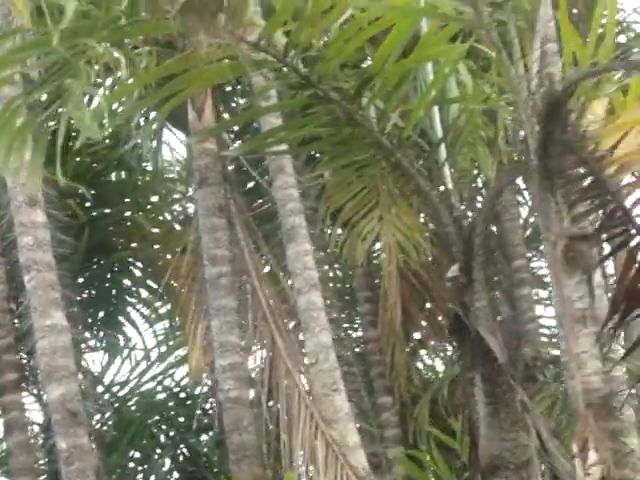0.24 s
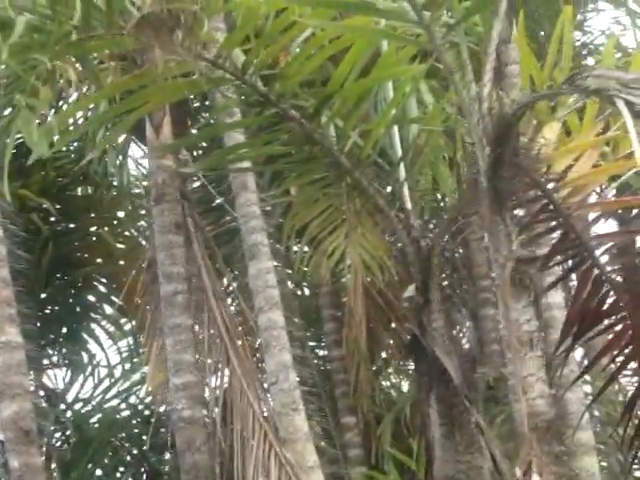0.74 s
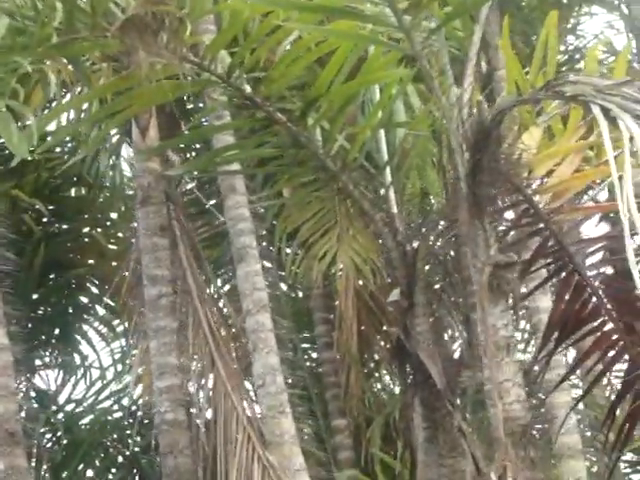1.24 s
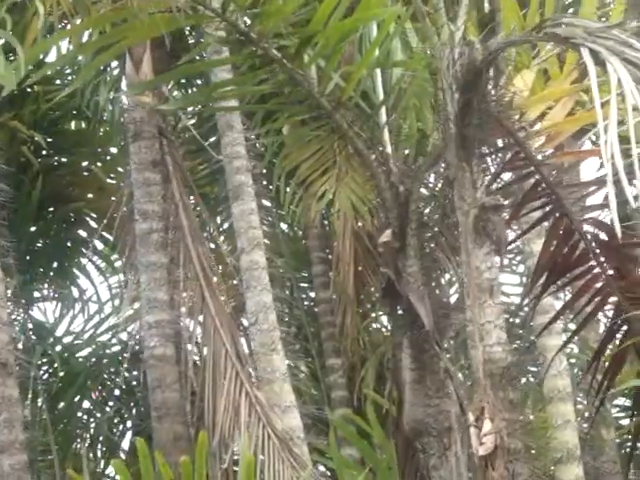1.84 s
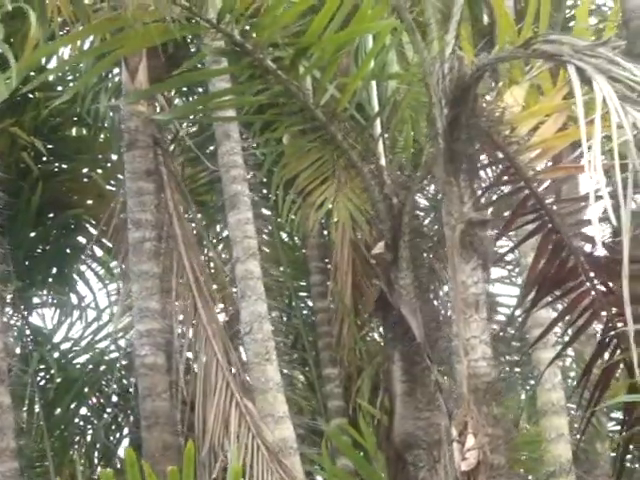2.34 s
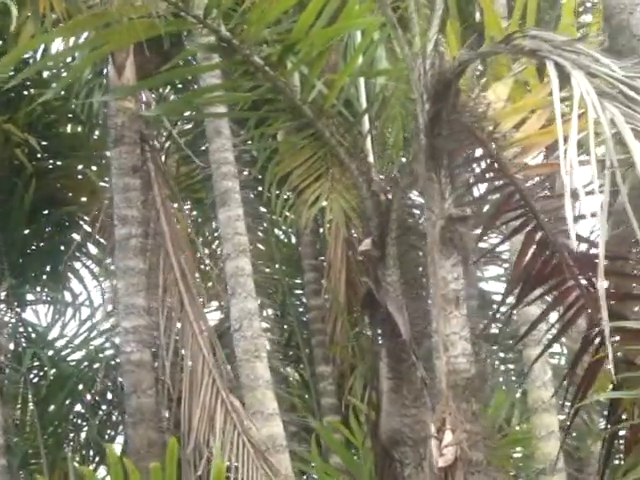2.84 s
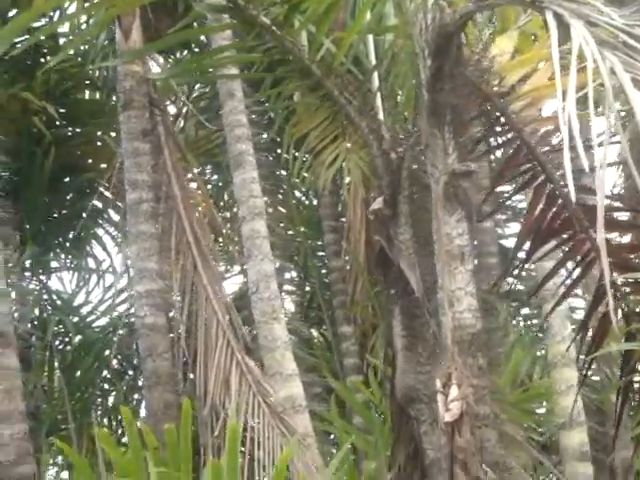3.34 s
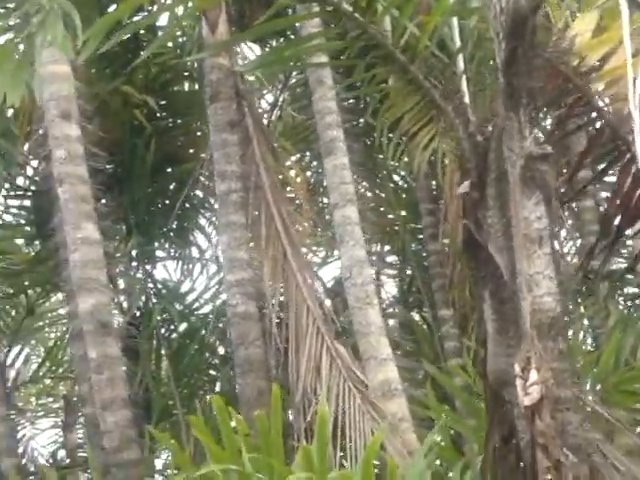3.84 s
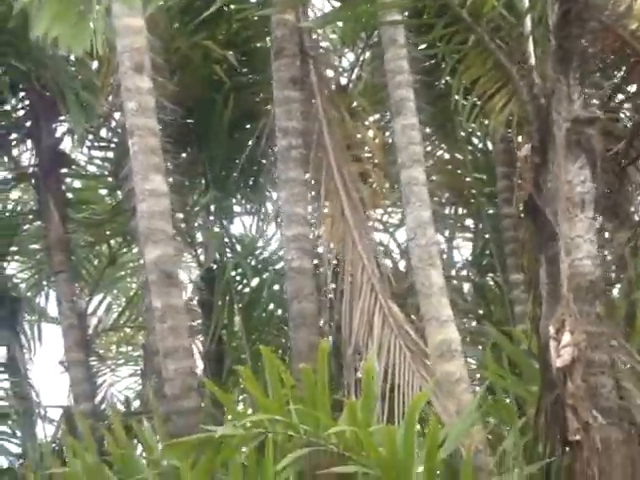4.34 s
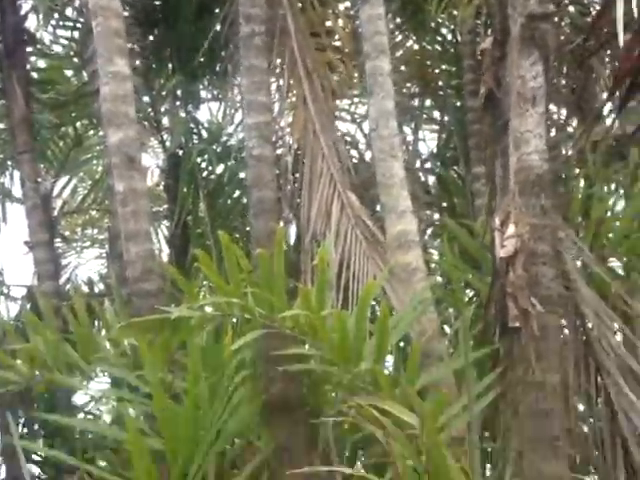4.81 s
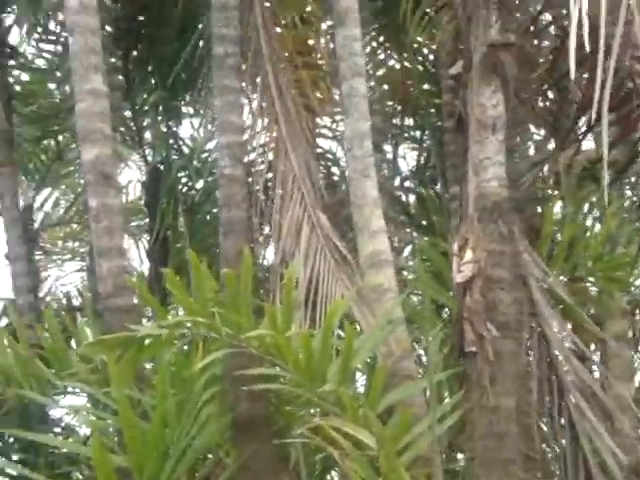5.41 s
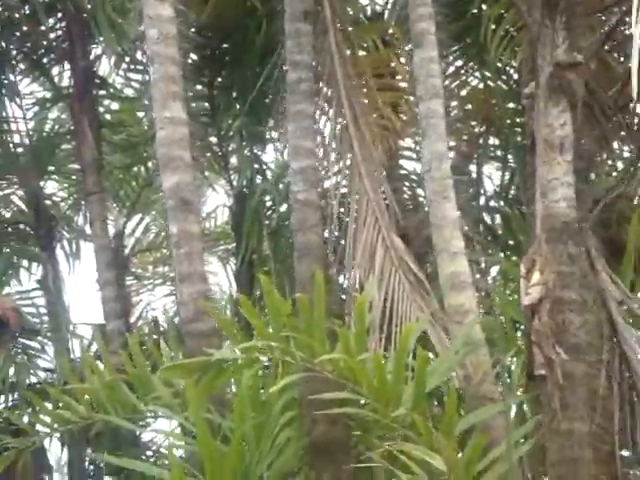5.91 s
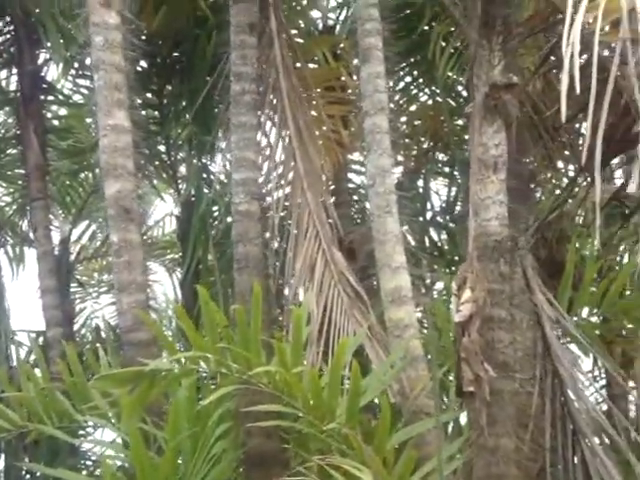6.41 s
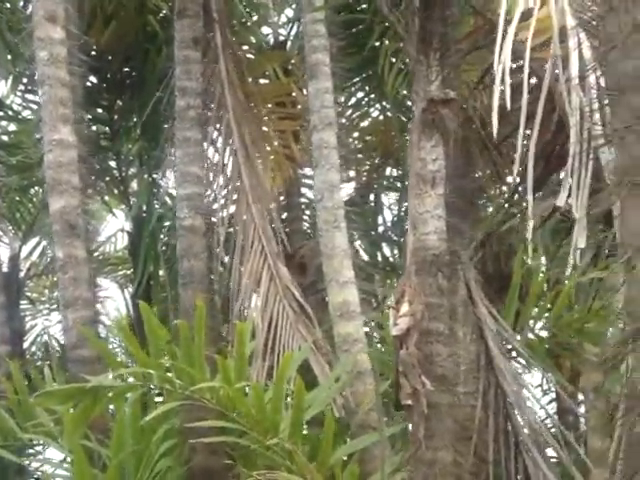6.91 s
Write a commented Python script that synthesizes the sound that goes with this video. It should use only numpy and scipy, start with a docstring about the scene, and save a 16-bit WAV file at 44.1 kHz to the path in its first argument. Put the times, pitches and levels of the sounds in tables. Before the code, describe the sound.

A colony of birds squawks, trills, chips and squeals among palms, with sharp bill snaps, short echoes and a faint leafy hush.

```python
"""A colony of birds in palm crowns, a few metres from a small mono microphone, over a hush of filtered noise.
Whistles (gliding harmonics) open; from 0.5 s come trills (pitch and level swung together), low clucks, rising
chips and bill snaps (noise bursts in one resonance). A long squeal at 2.5 s arches up and slides down; a run
of chips and clucks follows near 4 s, then short squeals, more snaps and a last shriek at 6.5 s.
Fronds and trunks scatter a short echo of every call, by convolution with decaying noise."""
import sys
import numpy as np
from scipy import signal
from scipy.fft import rfft, irfft, next_fast_len
from scipy.io import wavfile
from scipy.ndimage import uniform_filter1d

SR = 44100
rng = np.random.default_rng(int(sys.argv[2]) if len(sys.argv) > 2 else 0)


def store_pcm(level_fs):
    """Save levels as 16-bit WAV."""
    pcm = np.round(np.clip(level_fs, -1, 1) * 32767).astype(np.int16)
    wavfile.write(sys.argv[1], SR, np.atleast_2d(pcm).T)


N = 315756


def undb(db):
    """Decibel definition: amplitude ratio of a level in dB."""
    return 10 ** (np.asarray(db) / 20)


def colour_db(points, hz):
    """Spectral envelope: level through (Hz, dB) points, straight on a log-frequency axis."""
    point_hz, point_db = np.transpose(points)
    return np.interp(np.log(np.maximum(hz, 1)), np.log(point_hz), point_db)


def unit(x):
    """Power normalisation: scales to an rms of 1."""
    return x / np.sqrt(np.mean(x ** 2))


def crest(x):
    """Peak normalisation: scales to a peak of 1."""
    return x / np.max(np.abs(x))


def wander(n, hz):
    """Band-limited random modulation: drift between -1 and 1, changing about hz times a second."""
    k = max(int(SR / hz), 1)
    noise = rng.standard_normal(n + 4 * k)
    drift = uniform_filter1d(uniform_filter1d(noise, k), k)[2 * k:2 * k + n]
    return np.tanh(np.sqrt(k) * drift)


def add(out, start_s, x):
    """Superposition: sums a sound into the scene from its start time."""
    i = int(start_s * SR)
    out[i:i + len(x)] += x[:N - i]


# Leaves and distance: relative spectrum of the noise. Each row: frequency in Hz, level in dB per Hz.
HUSH = [(12, -70.5), (20, -27), (117, -8), (191, -2.5), (235, -1.5), (375, 1), (882, -1), (953, -2),
        (1970, -5.5), (2690, -6.5), (3580, -5.5), (4180, -7), (9840, -12.5), (12800, -60), (21600, -120)]
HUSH_DB = -52  # rms level


def hush():
    """Filtered noise: leaves and distance, in half-octave bands whose levels flicker independently."""
    n = next_fast_len(N)
    f = np.arange(n // 2 + 1) * SR / n
    noise = rfft(rng.standard_normal(n)) * undb(colour_db(HUSH, f))
    edges_hz = np.r_[0, 100 * 2 ** np.arange(0, 7, .5), SR]
    total = np.zeros(N)
    for low_hz, high_hz in zip(edges_hz, edges_hz[1:]):
        band = irfft(noise * (f >= low_hz) * (f < high_hz), n)[:N]
        total += band * undb(2.3 * wander(N, 3.36))
    return unit(total) * undb(HUSH_DB)


FADE_S = 0.0017  # soft edges of every call
ONSET_DB, RELEASE_DB = -16, -18  # at the very start, below the held level; at the very end, below the hold's end


def phrase(start_s, attack_s, hold_s, release_s, onset_hz, held_hz, end_hz, db, swell_db, bend):
    """Envelope and glide: level rises, swells or sags, drops; pitch slides to its hold, then bends away."""
    knots = np.cumsum([0, attack_s, hold_s, release_s])
    t = np.arange(0, knots[-1], 1 / SR)
    # a bend of 1 glides straight, more leaves the held pitch later
    late = np.clip((t - attack_s) / (hold_s + release_s), 0, 1) ** bend
    hz = np.interp(t, knots[:2], [onset_hz, held_hz]) + (end_hz - held_hz) * late
    level_db = db + np.interp(t, knots, [ONSET_DB, 0, swell_db, swell_db + RELEASE_DB])
    edge = np.clip(np.minimum(t, knots[-1] - t) / FADE_S, 0, 1)
    return start_s, t, edge, hz, level_db


def notes(rows, release_s, bend):
    """Common articulation: phrases that share one release and one bend."""
    return [phrase(start_s, attack_s, hold_s, release_s, *rest, bend)
            for start_s, attack_s, hold_s, *rest in rows]


def syrinx(hz, overtones_db, flicker_db=0, flicker_hz=25):
    """Harmonic source: additive synthesis on a moving pitch, each harmonic flickering on its own."""
    phase = 2 * np.pi * np.cumsum(hz) / SR
    total = np.zeros(len(hz))
    for k, db in enumerate(overtones_db, 1):
        gain = undb(db + flicker_db * wander(len(hz), flicker_hz))
        # harmonics fade out from 1/4 to 3/8 of the sample rate, against aliasing
        gain = gain * np.clip(3 - 8 * k * hz / SR, 0, 1)
        total += gain * np.sin(k * phase + k * k)
    return np.sqrt(2) * total


def resonate(x, peaks, slope=None):
    """Resonance: a spectrum boosted by (Hz, width Hz, boost dB) peaks and a (Hz, dB) slope."""
    f = np.arange(len(x) // 2 + 1) * SR / len(x)
    db = sum(boost_db / (1 + (2 * (f - hz) / width_hz) ** 2) for hz, width_hz, boost_db in peaks)
    if slope:
        db = db + colour_db(slope, f)
    return irfft(rfft(x) * undb(db), len(x))


# Broad colour of the vocal tract. Each row: frequency in Hz, level in dB.
THROAT = [(400, -35), (700, -4), (1000, -1.5), (2000, -0.5), (4500, 1), (7000, -6.5), (8500, -14.5),
          (10500, -22.5)]
# Resonances of the windpipe. Each row: centre in Hz, width in Hz, boost in dB.
BEAK = [(1440, 1800, 1.5), (3350, 840, 3), (6500, 610, 2)]


def throat(x, bill=()):
    """Source-filter principle: windpipe and bill shape a call, brought to an rms of 1."""
    return unit(resonate(x, [*BEAK, *bill], THROAT))


def steady_voices(out, calls, overtones, bill, waver, flicker_db, breath_db):
    """Harmonic source plus turbulence: nearly steady pitches that waver, with some air escaping."""
    for (start_s, t, edge, hz, db), overtones_db in zip(calls, overtones):
        n = len(t)
        hz = hz * (1 + waver * wander(n, 200))
        breath_gain = undb(breath_db + 8.3 * wander(n, 20))
        breath = breath_gain * throat(rng.standard_normal(n))
        voice = resonate(syrinx(hz, overtones_db, flicker_db, flicker_hz=54.0), bill)
        level = undb(db + 1.5 * wander(n, 150))
        add(out, start_s, edge * level * (voice + breath))


# Clean whistles. Each row: start in seconds, attack in seconds, hold in seconds, onset pitch in Hz,
# held pitch in Hz, end pitch in Hz, level in dB, swell over the hold in dB.
WHISTLES = [ (0.0, .005, 0.15, 5074, 5090, 4000, -61, 2.5), (0.15, .03, .14, 3917, 4122, 4038, -58, -1),
            (0.355, .02, .035, 4831, 6231, 6130, -44, -4), (0.42, .004, 0.035, 5250, 5240, 4450, -44, -9.5),
            (1.055, .004, .04, 6113, 6113, 6200, -47, -3), (2.215, 0.011, 0.039, 2410, 2574, 2575, -24, -8),
            (3.8, 0.0067, 0.044, 6890, 6960, 6564, -57, -6), (3.853, 0.013, .02, 6409, 6300, 7600, -35, -2),
            (4.31, 0.038, 0.09, 3530, 3437, 4130, -33.5, -1.5), (4.55, 0.019, .23, 678, 675, 663, -56, -2),
            (4.642, .006, .05, 2490, 2498, 2539, -23.5, -28.5),
            (4.745, .032, .01, 5555, 5904, 6076, -47.5, -11),
            (4.95, 0.052, .11, 2960, 2570, 1830, -52, 4.5), (6.0, .004, .074, 1964, 1950, 1609, -58, -2),
            (6.085, 0.036, 0.06, 1900, 2223, 1550, -44.5, -8),
            (6.19, .003, .016, 6646, 6600, 6646, -46, -20),
            (6.212, 0.0065, .04, 6250, 6380, 7800, -42.5, -1), ]
# Whistle spectrum. Each entry: level of one harmonic in dB, from the fundamental up.
WHISTLE_OVERTONES = [0, -30.5, -39]
WHISTLE_RELEASE_S, WHISTLE_BEND = .008, 1.3


def whistles(out):
    """Near-sinusoidal tone: a strong fundamental with weak overtones and faint breath."""
    calls = notes(WHISTLES, WHISTLE_RELEASE_S, WHISTLE_BEND)
    steady_voices(out, calls, [WHISTLE_OVERTONES] * len(WHISTLES), [],
                  waver=0.025, flicker_db=2.5, breath_db=-31)


def tail(t60_s, gap_s, db):
    """Exponential decay: noise as dense scattered echoes, silent during the first gap."""
    t = np.arange(SR) / SR
    echoes = rng.standard_normal(SR) * 1000 ** (-t / t60_s) * (t > gap_s)
    return undb(db) * unit(echoes) / np.sqrt(SR)


# fronds around the nests
NEAR_T60_S, NEAR_DB, NEAR_GAP_S = 0.09, -4.5, .003
# trunks; the level is before the band filter
GROVE_T60_S, GROVE_DB, GROVE_GAP_S, GROVE_TOP_HZ = 0.66, -13.5, 0.017, 5050


def grove(x):
    """Convolution with an impulse response: quick echoes off the fronds, a dull tail from the trunks."""
    dull = signal.butter(1, [500, GROVE_TOP_HZ], "band", fs=SR, output="sos")
    fronds = tail(NEAR_T60_S, NEAR_GAP_S, NEAR_DB)
    trunks = signal.sosfilt(dull, tail(GROVE_T60_S, GROVE_GAP_S, GROVE_DB))
    return signal.fftconvolve(x, fronds + trunks)[:N]


# Trilled and rasping calls. Each row: voice name, swing rate in Hz, start in seconds, attack in seconds,
# hold in seconds, release in seconds, onset pitch in Hz, held pitch in Hz, end pitch in Hz, level in dB,
# swell over the hold in dB.
TRILLS = [ ("dive", 51, .541, .003, .018, .004, 7900, 7900, 1020, -34.5, -10),
          ("rasp", 51, .552, .008, .175, .008, 2633, 2600, 2350, -39, -1),
          ("warble", 48, 0.913, 0.01205, .085, .025, 1810, 1850, 2150, -31, 8.5),
          ("pipe", 49.5, 1.003, 0.0218, .03, 0.031, 1900, 2480, 2390, -23.5, -2),
          ("twitter", 37, 1.482, .022, .06, .035, 3056, 3020, 2030, -41, 1),
          ("chatter", 25.7, 1.645, .035, .205, .025, 2900, 2782, 1315, -40, 7.8),
          ("low warble", 30, 1.832, .07, .17, .055, 1087, 1083, 860, -30, -1.1),
          ("scold", 58, 2.67, .07, .04, 0.085, 1700, 1700, 1710, -33.5, -1),
          ("screech", 103.5, 3.065, 0.0249, .13, .08, 2583, 2845, 2540, -23.5, 0.5),
          ("thin rasp", 65, 3.07, .06, .11, .12, 1800, 1795, 1516, -30.5, -2),
          ("wail", 63.5, 3.13, .03, .1, .125, 2670, 2540, 1230, -30.5, 0.46),
          ("scold", 76, 3.722, .023, .005, .04, 1405, 1445, 1350, -43, -1),
          ("dive", 45, 3.888, .002, .014, 0.00399, 7500, 7500, 915, -26.5, -12.5),
          ("rasp", 46, 3.892, 0.0081, .165, .065, 2233, 2200, 2050, -35.5, -2),
          ("thin rasp", 31, 4.1, 0.039, .35, 0.094, 2207, 2205, 2190, -44, 2.9),
          ("squawk", 50.3, 5.138, .035, .44, .1, 1350, 1140, 1120, -22.5, -4),
          ("flutter", 76, 6.078, .03, .03, .008, 3280, 3900, 3950, -44.5, -2),
          ("dive", 68, 6.247, .013, 0.0039, .012, 7000, 4400, 2900, -24, -1),
          ("buzz", 153, 6.25, .015, .12, 0.009, 823, 835, 810, -32, -5.5),
          ("croak", 57.5, 6.38, .04, .275, 0.0125, 1703, 1709, 1620, -35.5, 2),
          ("shriek", 234.5, 6.515, .065, .132, .025, 2200, 2690, 1300, -18.5, -5.5), ]
# Voices by name. Each row: level swing in dB, harmonic slope in dB per octave, bill resonance in Hz,
# its boost in dB, pitch swing in octaves at start and at end, roughness in octaves of random pitch
# at start and at end, bend of the glide (no unit).
VOICES = { "dive": (1, -7.5, 1000, -6, 0.04, 0.07, 0.13, 0.2, 1.1),
          "rasp": (.9, 7.2, 5250, 3.7, .09, 0.132, .4, .55, 1.2),
          "thin rasp": (1.5, 2.7, 7330, 10.3, .06, .08, .55, .57, 1.8),
          "warble": (.1, 2.4, 2840, 10.7, .52, .36, 0.242, 0.204, 1.3),
          "pipe": (.1, 2.2, 2400, 16.6, 0.056, .005, 0.083, .03, 1.12),
          "twitter": (1.2, 2.5, 5330, 11.6, .05, .14, 0.12, 0.076, 1.6),
          "chatter": (.6, 3.3, 5540, 8, 0.0804, .33, 0.081, .12, 2.8),
          "low warble": (.5, -.5, 2252, -6, .56, 0.53, 0.2, 0.35, 3.0),
          "scold": (2.5, -1, 2999, 8.5, 0, .06, 0.44, 0.24, 1.1),
          "screech": (1.5, -14.5, 7200, 0, 0.04, .08, 0.16, 0.06, 1.2),
          "wail": (0, -9, 1998, -0.5, 0.13, 0, .12, .14, 1.14),
          "squawk": (2.7, 0.63, 3110, 5.6, .33, .07, .4, .22, 1.1),
          "flutter": (3.5, -4, 3998, -13.5, .02, 0.1, .05, .05, 1),
          "buzz": (6.9, 3, 2120, 25.6, 0.041, 0.046, .13, .18, 1.09),
          "shriek": (.5, 3, 2800, 11.8, .11, 0.021, .15, .03, 3.5),
          "croak": (1.4, 5.6, 1760, 11, .025, .025, .23, 0.191, 1.9), }
BILL_WIDTH_HZ = 1050


def trills(out):
    """Frequency and amplitude modulation: a second oscillator and the membrane's unrest bend the pitch."""
    octave_of_harmonic = np.log2(np.arange(1, 11))
    for voice, swing_hz, *call in TRILLS:
        swing_db, slope_db, bill_hz, bill_db, *ends, bend = VOICES[voice]
        start_s, t, edge, hz, db = phrase(*call, bend)
        n = len(t)
        octaves, rough = np.linspace(ends[::2], ends[1::2], n, axis=1)
        # the swing lingers at both ends of its travel
        swing = np.tanh(2.5 * np.cos(2 * np.pi * swing_hz * t))
        hz = hz * 2 ** (octaves * swing + rough * wander(n, 1500))
        grain_db = swing_db * swing + 4 * np.tanh(4 * rough) * wander(n, 330)
        source = syrinx(hz, slope_db * octave_of_harmonic, flicker_db=4, flicker_hz=120)
        shaped = throat(source, [(bill_hz, BILL_WIDTH_HZ, bill_db)])
        add(out, start_s, edge * undb(db + grain_db) * shaped)


# Low clucks. Each row: start in seconds, peak level in dB.
CLUCKS = [(0.561, -27.5), (0.612, -34), (0.649, -32.5), (0.776, -35.5), (3.901, -26), (3.949, -30.5),
          (4.009, -36.5), (4.171, -34.5), (4.201, -34), (4.23, -31), (4.259, -28), (4.291, -29),
          (4.327, -26.5), (4.358, -29), (4.386, -29.5), (4.42, -29.5), (4.456, -28.5), (4.488, -31),
          (4.524, -30.5)]
# Shape of one cluck: start pitch in Hz, end pitch in Hz, length in seconds.
CLUCK = (1100, 670, 0.0179)


def clucks(out):
    """Falling glide: short low grunts whose pitch sags under fast random modulation."""
    high_hz, low_hz, length_s = CLUCK
    t = np.arange(0, length_s, 1 / SR)
    envelope = np.minimum(t / 0.0015, 1) * (1 - t / length_s)
    for start_s, db in CLUCKS:
        glide_hz = np.interp(t, [0, length_s], [high_hz, low_hz])
        hz = glide_hz * (1 + 0.398 * wander(len(t), 1100))
        grunt = syrinx(hz, [5.5, -25, -30, -32, 4])
        add(out, start_s, undb(db) * crest(envelope * grunt))


# Rising chips. Each row: start in seconds, peak level in dB.
CHIPS = [(0.685, -31), (0.7841, -26), (0.826, -23), (0.8755, -27.5), (0.9044, -31), (4.0128, -28.5),
         (4.0655, -23.5), (4.1124, -21.5), (4.1607, -22.5), (4.2044, -22), (4.249, -24), (4.2896, -25.5)]
# Shape of one chip: start pitch in Hz, end pitch in Hz, rise in seconds, length in seconds.
CHIP = (2450, 5500, .022, 0.035)


def chips(out):
    """Rising glide: an upward sweep over a gritty, randomly modulated buzz held near 2900 Hz."""
    low_hz, high_hz, rise_s, length_s = CHIP
    t = np.arange(0, length_s, 1 / SR)
    envelope = np.minimum(t / 0.0028, 1) * np.exp(-t / 0.015)
    for start_s, db in CHIPS:
        glide_hz = np.interp(t, [0, rise_s], [low_hz, high_hz])
        sweep = syrinx(glide_hz * (1 + 0.082 * wander(len(t), 900)), [0, -18])
        buzz = syrinx(2900 * (1 + 0.164 * wander(len(t), 1190)), [-1.5, -12])
        add(out, start_s, undb(db) * crest(envelope * (sweep + buzz)))


# Bill snaps and knocks on wood. Each row: start in seconds, peak level in dB, centre in Hz,
# width in octaves, decay time to -60 dB in seconds.
SNAPS = [(0.743, -13, 2750, 0.38, 0.022), (0.7468, -11.5, 2040, 1.27, 0.031), (1.502, -37, 201, 0.22, 0.24),
         (4.636, -20, 2700, 0.18, 0.011), (4.637, -28.5, 940, 0.34, 0.028),
         (5.776, -25.5, 2040, 0.82, 0.014), (5.92, -15.5, 720, 0.66, 0.02), (5.9204, -18, 2640, 0.2, 0.015),
         (6.389, -31, 610, 1, 0.088), (6.413, -16.5, 1010, 1.13, 0.019), (6.573, -34.5, 303, 0.46, 0.029)]


def snaps(out):
    """Impulsive excitation: a sudden noise burst in one resonance, decaying exponentially."""
    n = 4096
    t = np.arange(n) / SR
    f = np.maximum(np.arange(n // 2 + 1) * SR / n, 1)
    for start_s, db, centre_hz, octaves, t60_s in SNAPS:
        resonance = np.exp(-.5 * (np.log2(f / centre_hz) / octaves) ** 2)
        ring = irfft(rfft(rng.standard_normal(n)) * resonance)
        envelope = np.minimum(t / 0.00022, 1) * 1000 ** (-t / t60_s)
        add(out, start_s, undb(db) * crest(ring * envelope))


def columns(rows):
    """Piecewise-linear contour: a curve read at every sample of the call, with soft edges."""
    time_s, *curves = np.transpose(rows)
    t = np.arange(time_s[0], time_s[-1], 1 / SR)
    edge = np.clip(np.minimum(t - time_s[0], time_s[-1] - t) / FADE_S, 0, 1)
    return (time_s[0], t - time_s[0], edge, *(np.interp(t, time_s, curve) for curve in curves))


# The long squeal arches up and slides slowly down. Each row: time in seconds, pitch in Hz,
# level in dB before overtones and bill.
LONG_SQUEAL = [(2.49, 553.4, -56.5), (2.546, 1021, -46), (2.57, 1227, -40.5), (2.64, 1240, -33.5),
               (2.678, 1136, -35), (2.71, 908.4, -37.5), (2.776, 823, -40), (2.96, 722.5, -43),
               (3.24, 518.7, -50), (3.38, 423, -65)]
# Short squeals. Each row: start in seconds, attack in seconds, hold in seconds, onset pitch in Hz,
# held pitch in Hz, end pitch in Hz, level in dB before overtones and bill, swell over the hold in dB.
SQUEALS = [(4.825, 0.013, .012, 990, 1084, 1130, -33.5, -13.5),
           (5.002, .004, .03, 1160, 1166, 1200, -39, -17.5), (5.11, 0.0066, .035, 1360, 1409, 1324, -52, 1),
           (6.405, 0.0202, .12, 956, 1085, 1010, -31, 5)]
# Squeal spectra. Each row: one squeal, the long one first, as level of each harmonic in dB.
SQUEAL_OVERTONES = [
    [-11.5, -6.5, -3, -4, -5.5, -7.5, -10.5, -9.5, -12, -13, -11],
    [-9.5, -4, -15.5, -25, -29, -34],
    [-4, 4.5, -6.5, -5, -18, -6],
    [5.5, 7, 8.8, 5, 6.5],
    [-16, 1, -28, -13.5, -14.5, -26, -30],
]
# Resonances and a dip of windpipe and bill. Each row: centre in Hz, width in Hz, boost in dB.
SQUEAL_BILL = [(1410, 1070, 8), (3630, 400, 12), (5030, 290, -1.5), (8920, 1800, -15)]
SQUEAL_RELEASE_S, SQUEAL_BEND = 0.0243, 2.5


def squeals(out):
    """Source-filter principle: strong harmonics and breath, the harmonics coloured by windpipe and bill."""
    calls = [columns(LONG_SQUEAL), *notes(SQUEALS, SQUEAL_RELEASE_S, SQUEAL_BEND)]
    steady_voices(out, calls, SQUEAL_OVERTONES, SQUEAL_BILL,
                  waver=0.0143, flicker_db=5, breath_db=-14.0)


def scene():
    """Superposition: calls and snaps, their scattered echoes and the hush."""
    birds, near = np.zeros(N), np.zeros(N)
    whistles(birds)
    trills(birds)
    clucks(birds)
    chips(birds)
    snaps(near)
    squeals(birds)
    # the snaps lose their deep bass below about 170 Hz
    near = signal.sosfilt(signal.butter(2, 170, "high", fs=SR, output="sos"), near)
    # the snaps are close to the microphone and excite the grove less
    echoes = grove(birds + undb(-14.0) * near)
    return (birds + near + echoes + hush())[None]


TOP_HZ = 9900


def record(dry):
    """Low-pass filtering: the microphone chain cuts the top steeply."""
    return signal.sosfilt(signal.ellip(8, .2, 45, TOP_HZ, fs=SR, output="sos"), dry)


dry = scene()
out = record(dry)
store_pcm(out)
```